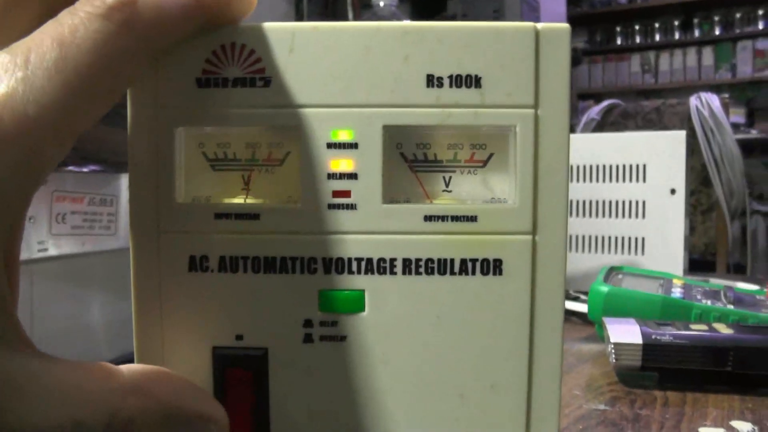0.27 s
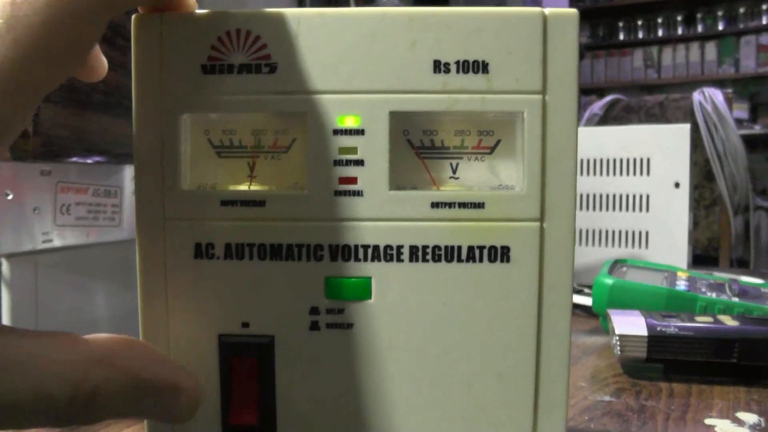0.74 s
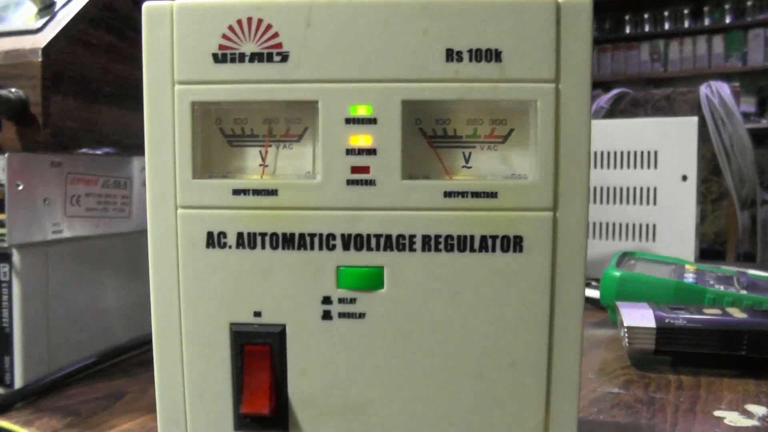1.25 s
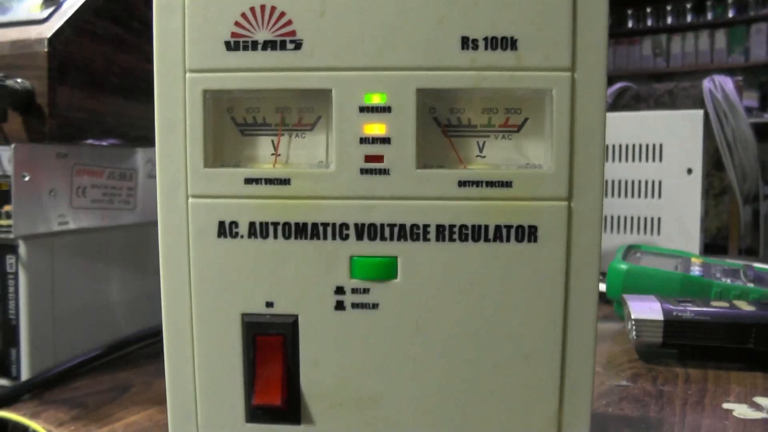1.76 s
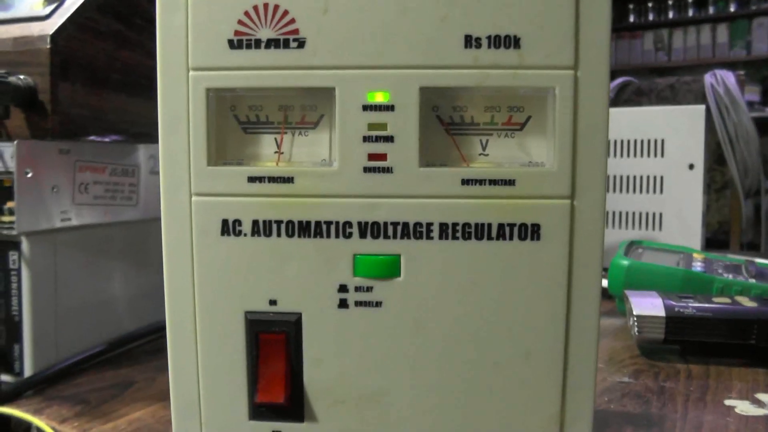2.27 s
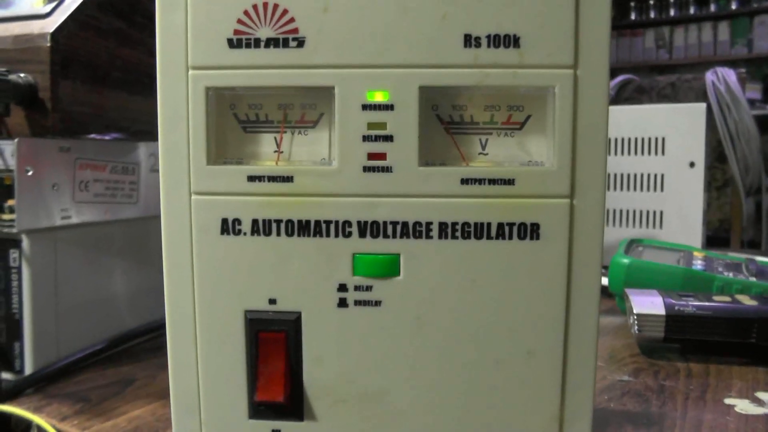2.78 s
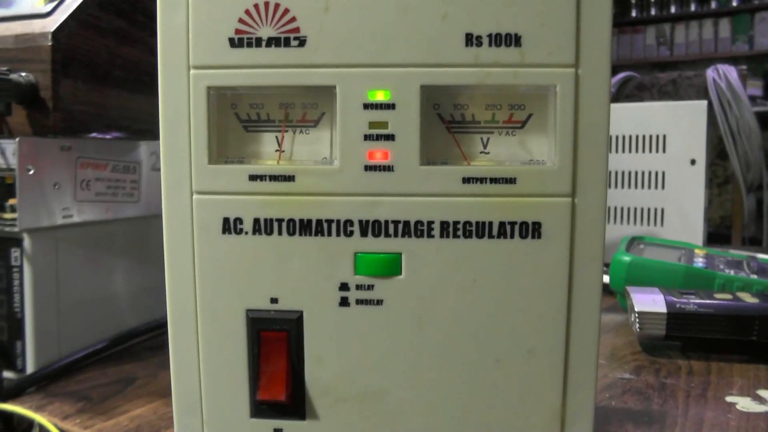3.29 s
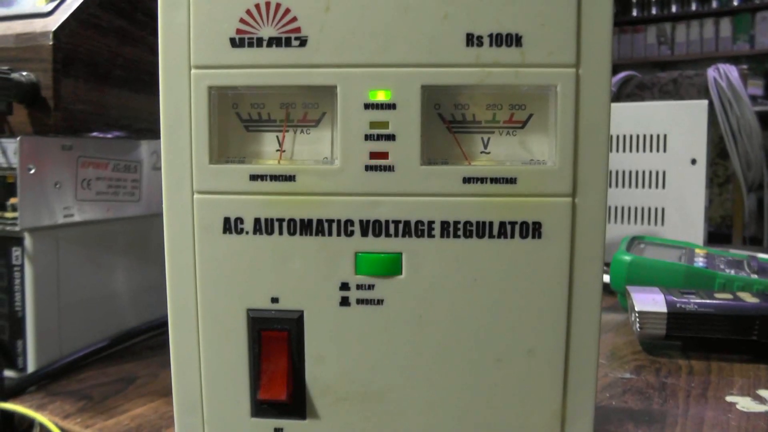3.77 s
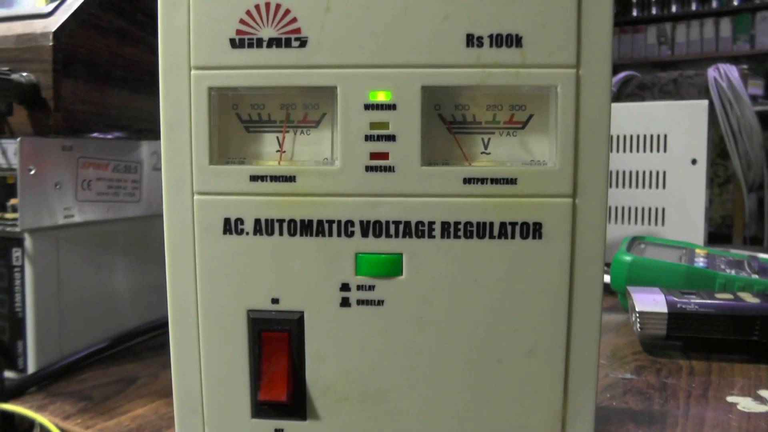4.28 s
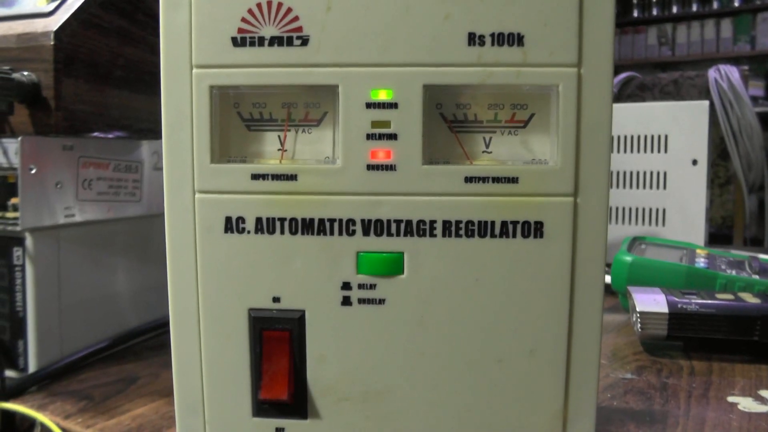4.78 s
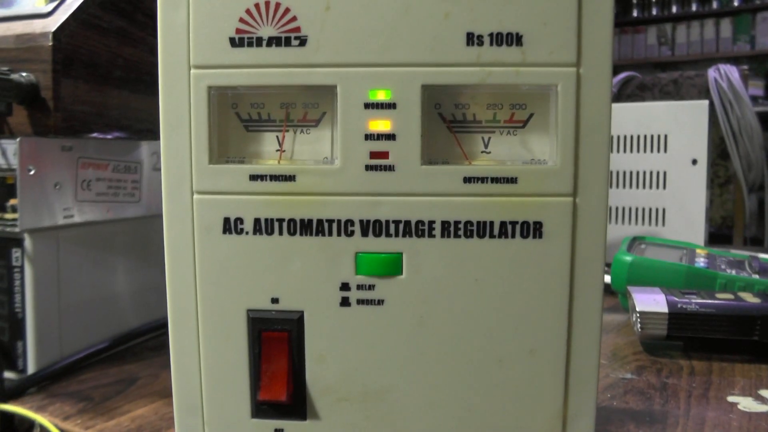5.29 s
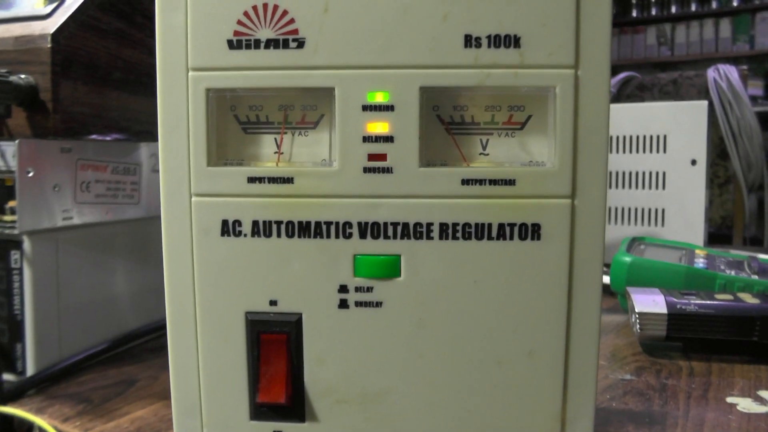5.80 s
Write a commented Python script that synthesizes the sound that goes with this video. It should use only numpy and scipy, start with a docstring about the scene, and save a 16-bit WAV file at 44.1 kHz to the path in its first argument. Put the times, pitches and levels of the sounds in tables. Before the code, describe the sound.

A voltage regulator hums faintly and steadily throughout, heard close up in a small room, with a low rumble of air, thin hiss and the low drone of a distant fan behind it. In the first second fingers rub and slip quietly on the plastic front panel, letting go with a soft tap at about 0.9 seconds. Just after 1 second a relay pulls in with a loud, hard, bright snap that rings briefly through the case, with a faint low thump under it. A sleeve swishes softly around 1.4 seconds. At 2.1 seconds the relay drops out with a softer, slightly more ringing metallic clack. The same sharp snap comes again at about 3.3 seconds, and the softer clack follows at 5.3 seconds. The hum carries on alone until the end, at about 6 seconds.

```python
"""A mains voltage regulator on a workbench, close up in a small room. Its transformer buzzes faintly
over the room's rumble and a distant fan. A hand slips on the case and lets go with a soft tap.
The relay pulls in: a hard snap that rings through the case, with a faint low thump. A sleeve swishes
as the arm draws back, then the relay's spring drops it out with a softer clack.
The relay pulls in and drops out once more over the hum."""
import sys
import numpy as np
from scipy import signal
from scipy.fft import rfft, irfft
from scipy.io import wavfile
from scipy.ndimage import uniform_filter1d

SR = 44100
rng = np.random.default_rng(int(sys.argv[2]) if len(sys.argv) > 2 else 0)


def store_wav(level_fs):
    """Save 16-bit WAV to argv[1]."""
    pcm = np.round(np.clip(np.atleast_2d(level_fs), -1, 1) * 32767)
    wavfile.write(sys.argv[1], SR, pcm.T.astype(np.int16))


N = 266496
TIME = np.arange(N) / SR
HZ = np.maximum(np.fft.rfftfreq(N, 1 / SR), 1)
AGE = TIME[:SR // 2]   # seconds since a blow

# the armature hits the core: t/s, level/dB, left minus right/dB
PULL_INS = [(1.0372, -2.0, .3), (3.2579, -2.2, .3)]


def from_db(db):
    """Decibels to gain."""
    return 10 ** (np.asarray(db) / 20)


def rms_one(x):
    """Scale to unit power."""
    return x / np.sqrt(np.mean(x ** 2) + 1e-20)


def at_hz(points):
    """Read a spectrum table on a log-frequency axis."""
    hz, value = np.transpose(points)
    return np.interp(np.log(HZ), np.log(hz), value)


def fade(t60):
    """Exponential decay, 60 dB down after t60 seconds."""
    return np.exp(-np.log(1000) * AGE / t60)


def stroke(peak_s, swell_db_per_s, release_db_per_s):
    """Gain of a rubbing movement that gathers speed up to its peak and then stops."""
    return from_db(np.minimum(swell_db_per_s * (TIME - peak_s), release_db_per_s * (peak_s - TIME)))


def add(out, s, sound):
    """Mix a stereo sound in at s seconds."""
    start = round(s * SR)
    out[:, start:start + sound.shape[1]] += sound[:, :N - start]


def highpass(x, hz, order):
    """Roll off the lows below hz."""
    return signal.sosfilt(signal.butter(order, hz, "high", fs=SR, output="sos"), x)


def resonate(x, hz, width_hz):
    """Two-pole resonance with unity gain at its peak."""
    r = np.exp(-np.pi * width_hz / SR)
    feedback = [1, -2 * r * np.cos(2 * np.pi * hz / SR), r * r]
    return signal.lfilter(np.array([1, 0, -1]) * (1 - r * r) / 2, feedback, x + 1e-18)


def response(body):
    """Impulse response of parallel resonances, unit energy."""
    click = signal.unit_impulse(len(AGE))
    colour = sum((-1) ** k * from_db(db) * resonate(click, hz, width)
                 for k, (hz, width, db) in enumerate(body))
    return colour / np.linalg.norm(colour)


def scatter():
    """A dense train of reflections with an even spectrum; rms 1."""
    train = rng.standard_normal(len(AGE))
    for size in (2048, 512, 64):
        frames = signal.stft(train, nperseg=size)[2]
        train = signal.istft(frames / (abs(frames) + 1e-9), nperseg=size)[1][:len(AGE)]
    return rms_one(train)


def blow(paths, envelope):
    """A hit smeared in time by its many paths; it keeps the even spectrum of an impulse."""
    spectrum = rfft(paths * envelope)
    smooth_power = uniform_filter1d(abs(spectrum) ** 2, size=90)
    even = irfft(spectrum / np.sqrt(smooth_power + 1e-12), len(AGE))
    return even * np.linalg.norm(envelope) * (AGE < AGE[-1] / 2)


def stereo_noise(spectrum):
    """Coloured noise whose stereo width varies with frequency; rms 1."""
    # likeness of left and right: f/Hz, correlation
    likeness = [(30, .05), (70, 0.96), (130, 0.57), (290, 0.67), (640, 0.76), (1400, 0.97), (3100, 1),
                (6800, 1), (9000, 0.66), (15000, 0.32)]
    alike = np.clip(at_hz(likeness), 0, 1)
    mid, side = rfft(rng.standard_normal((2, N)))
    pair = np.sqrt(1 + alike) * mid + np.sqrt(1 - alike) * side * [[1], [-1]]
    return rms_one(irfft(pair * from_db(at_hz(spectrum)), N))


def transformer(mains_hz, overtone_db, waver_db):
    """Core plates buzz on mains harmonics under a faint comb of overtones; each line wavers a little."""
    # the main lines of the buzz: f/Hz, rms level/dB
    buzz = [(100, -83), (150, -65), (200, -66), (400, -61.5), (700, -67.5), (900, -83), (1100, -72.5),
            (1300, -72.5), (1400, -69.5), (1500, -66.5), (1600, -68), (1800, -72), (1900, -67.5),
            (2000, -83), (2800, -77), (3200, -78), (3700, -78), (3900, -78.5)]
    lines = [(round(hz / mains_hz), db) for hz, db in buzz]
    lines += [(harmonic, overtone_db + rng.normal(0, 3)) for harmonic in range(42, 110, 2)]
    knots = np.linspace(0, TIME[-1], 25)
    out = np.zeros(N)
    for harmonic, db in lines:
        gain = np.interp(TIME, knots, from_db(db + waver_db * rng.standard_normal(len(knots))))
        out += gain * np.sin(2 * np.pi * (harmonic * mains_hz * TIME + rng.random()))
    return np.sqrt(2) * out


def room_tone():
    """The bed: rumbling air, a beating low drone and thin hiss."""
    # colours of the air and of the hiss: f/Hz, relative level/dB
    air_colour = [(15, -45.5), (25, -9), (81, -11.5), (112, -1), (171, -7.5), (314, -2), (363, -11),
                  (398, -3), (429, -7.5), (479, -4.5), (845, -12), (1550, -17.5), (2000, -19.5),
                  (2600, -47.5), (4400, -120)]
    hiss_colour = [(1500, -3.5), (2200, 2), (2650, 4.5), (3300, 5.5), (3600, 2.5), (5000, -4), (5700, -2.5),
                   (6100, 0.5), (6600, -7.5), (7800, -8), (10500, -2), (14000, -1), (16000, -5)]
    # narrow noise bands of the drone: f/Hz, width/Hz, rms level/dB
    drone_bands = [(120.4, 21, -66), (245, 25, -61), (315, 25, -62)]
    air = from_db(-54) * stereo_noise(air_colour)
    drone = sum(from_db(db) * rms_one(resonate(rng.standard_normal(N + SR), hz, width)[SR:])
                for hz, width, db in drone_bands)
    hiss = from_db(-58) * highpass(stereo_noise(hiss_colour), hz=1900, order=2)
    return air + drone + hiss


def fan(hz, level_db, wander_hz, waver_db):
    """The low tone of a distant fan, unsteady in pitch and level."""
    knots = np.linspace(0, TIME[-1], 70)
    speed, swell = (np.interp(TIME, knots, v) for v in rng.standard_normal((2, len(knots))))
    phase = 2 * np.pi * np.cumsum(hz + wander_hz * speed) / SR
    return np.sqrt(2) * from_db(level_db + waver_db * swell) * np.sin(phase)


def fingers(grip_db, touch_t60, room_db, room_t60):
    """Fingers rub and slip on the plastic front panel, and tap it softly as they let go."""
    # resonances of the panel: f/Hz, width/Hz, relative level/dB
    panel = [(123, 50, -1), (265, 60, -6), (648, 55, 4), (1490, 190, -10), (2900, 1200, -19.5),
             (5500, 2500, -25.5)]
    # peak of each slip as the grip loosens: t/s, level/dB
    slips = [(.58, -59.5), (.86, -53)]
    # fingers leaving the case: t/s, level/dB
    taps = [(.755, -58), (.8697, -35)]
    colour = response(panel)
    grip = from_db(grip_db) * stroke(slips[-1][0], swell_db_per_s=0, release_db_per_s=150)
    swells = [from_db(db) * stroke(s, swell_db_per_s=75, release_db_per_s=150) for s, db in slips]
    friction = np.linalg.norm([grip] + swells, axis=0)
    rub = friction * signal.fftconvolve(rng.standard_normal(N), colour)[:N]
    out = np.array([rub, rub])
    tap_envelope = np.hypot(fade(touch_t60), from_db(room_db) * fade(room_t60))
    for s, db in taps:
        tap = from_db(db) * signal.fftconvolve(blow(scatter(), tap_envelope), colour)
        add(out, s, np.array([tap, tap]))
    return out


def relay(blows, body, rings, *, rise_s, snap_s, ring_db, case_db, case_t60,
          echo_db, echo_s, room_db, room_t60, blur, variation, side_db):
    """Each snap, its rattle round the case and its room tail, coloured by the body; clear rings on top."""
    rise = 1 - np.exp(-(AGE / rise_s) ** 2)   # contact takes a fraction of a millisecond
    snap = np.exp(-(AGE / snap_s) ** 2)
    near = rise * np.hypot(snap, from_db(case_db) * fade(case_t60))
    echo = from_db(echo_db) * np.interp(AGE - echo_s, AGE, near, left=0)   # off the nearest wall
    far = np.hypot(echo, rise * from_db(room_db) * fade(room_t60))
    # the room gathers sound from every face of the case, so its colour is more even
    colours = response(body), response([(hz, width, db * (1 - blur)) for hz, width, db in body])

    def clack(paths):
        """Direct sound plus room sound along the given pair of paths."""
        return sum(signal.fftconvolve(blow(path, envelope), colour)[:len(AGE)]
                   for path, envelope, colour in zip(paths, (near, far), colours))

    paths = scatter(), scatter()   # the same parts meet every time, so the hits sound alike
    metal = rise * sum(from_db(ring_db + db) * fade(t60) * np.sin(2 * np.pi * (hz * AGE + rng.random()))
                       for hz, db, t60 in rings)
    out = np.zeros((2, N))
    for s, level_db, pan_db in blows:
        mid = clack([path + variation * scatter() for path in paths]) + metal
        # only the shortest waves spread in stereo
        side = from_db(side_db) * highpass(clack([scatter(), scatter()]), hz=10000, order=3)
        pan = from_db([[pan_db / 2], [-pan_db / 2]])
        add(out, s, from_db(level_db) * pan * np.array([mid + side, mid - side]))
    return out


def pull_in():
    """The armature slams onto the core: a hard, bright snap."""
    # broad resonances of relay and case, armature closed: f/Hz, width/Hz, relative level/dB
    body = [(850, 270, -18), (1500, 530, -15.5), (2170, 140, -3.5), (2700, 150, 0.5), (3080, 290, -5),
            (3770, 780, -10), (4400, 350, -6), (6100, 1200, -5.5), (8250, 350, 1.5), (9180, 450, 3),
            (9910, 410, 3), (11000, 700, -3.5), (13400, 1000, 0.5), (15300, 900, -11)]
    # rings of the case panels and relay frame: f/Hz, relative level/dB, t60/s
    rings = [ (495, -16, .09), (855, -8, .06), (6250, -12, .2), (6611, -7, .13), (8195, 3, .09),
             (9115, -3, .12), (9333, -1, .13), (9985, -1, .14), (10911, -6, .15), (12640, -6, .13),
             (13349, 0, .13), (13710, -4, .13)]
    return relay(PULL_INS, body, rings, rise_s=.0003, snap_s=.0009, ring_db=-28,
                 case_db=-8.5, case_t60=.022, echo_db=-16, echo_s=.0098,
                 room_db=-18.5, room_t60=.18, blur=.2, variation=.4, side_db=-13)


def thump(thump_db, hz, width_hz, t60, right_gain):
    """A faint low thump under each pull-in, in opposite polarity left and right."""
    out = np.zeros((2, N))
    for s, level_db, _ in PULL_INS:
        jolt = signal.fftconvolve(blow(scatter(), fade(t60)), response([(hz, width_hz, 0)]))
        add(out, s, from_db(level_db + thump_db) * np.array([jolt, -right_gain * jolt]))
    return out


def sleeve(peak_s, level_db):
    """One soft swish as the arm draws back."""
    # cloth rubbing on cloth: f/Hz, relative level/dB
    cloth = [(300, -20), (1500, -5), (4200, 0), (8000, -11), (15000, -19)]
    swish = stroke(peak_s, swell_db_per_s=40, release_db_per_s=85)
    return from_db(level_db) * swish * stereo_noise(cloth)


def drop_out():
    """The spring throws the armature back on its stop: a softer clack with more ring."""
    # the armature hits the stop: t/s, level/dB, left minus right/dB
    blows = [(2.1013, -16, 0.7), (5.3011, -16, 1.1)]
    # broad resonances of relay and case, armature open: f/Hz, width/Hz, relative level/dB
    body = [(456, 110, -15.5), (1180, 270, -12), (2200, 140, -11), (2620, 195, -3), (2885, 510, -7.5),
            (5290, 530, -2.5), (5600, 400, -3), (6700, 590, -0.5), (8530, 850, -5.5), (9830, 300, 0.5),
            (11500, 2300, -10.5), (13800, 900, -4.5), (15600, 430, -17)]
    # rings of the case panels and relay frame: f/Hz, relative level/dB, t60/s
    rings = [ (470, -16, .1), (505, -12, .1), (852, -3, .065), (1211, -20, .2), (1275, -10, .06),
             (4813, -9, .11), (4925, -7, .11), (5507, -10, .13), (5895, -12, .14), (6195, -5, .13),
             (6257, -5, .14), (6582, -4, .11), (6676, -4, .13), (6741, -2, .13), (6857, -2, .1),
             (7085, -9, .13), (7548, -1, .11), (8403, -8, .12), (8558, -6, .1), (9879, -5, .12),
             (14260, -9, .13)]
    return relay(blows, body, rings, rise_s=.0004, snap_s=.0015, ring_db=-11,
                 case_db=1, case_t60=.031, echo_db=-11, echo_s=.0102,
                 room_db=-10.5, room_t60=.18, blur=.036, variation=.35, side_db=-12.5)


def scene():
    """Relay snaps and hand movements over the steady hum."""
    snaps = pull_in() + drop_out()
    low = thump(thump_db=-33, hz=60, width_hz=170, t60=.03, right_gain=.8)
    hand = fingers(grip_db=-64, touch_t60=.033, room_db=-17, room_t60=.21)
    hum = transformer(mains_hz=49.98, overtone_db=-87, waver_db=1.0)
    hum += fan(hz=120.3, level_db=-60.5, wander_hz=2.98, waver_db=1.0)
    return hum + room_tone() + hand + snaps + low + sleeve(peak_s=1.435, level_db=-52)


def record(dry):
    """The highest peaks clip and the top end is cut steeply."""
    cutoff_hz = 15900
    clipped = np.clip(dry, -1, 1)
    return irfft(rfft(clipped) / np.sqrt(1 + (HZ / cutoff_hz) ** 160), N)


dry = scene()
out = record(dry)
store_wav(out)
```